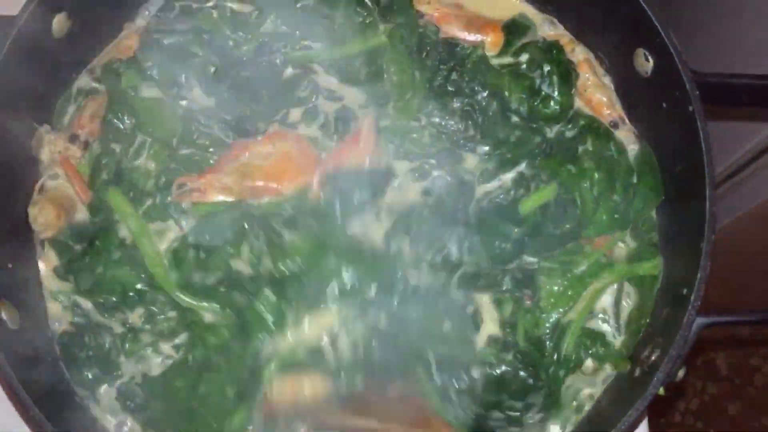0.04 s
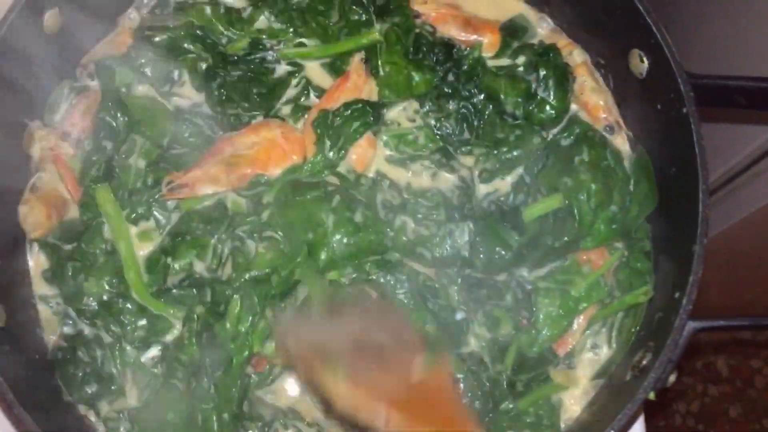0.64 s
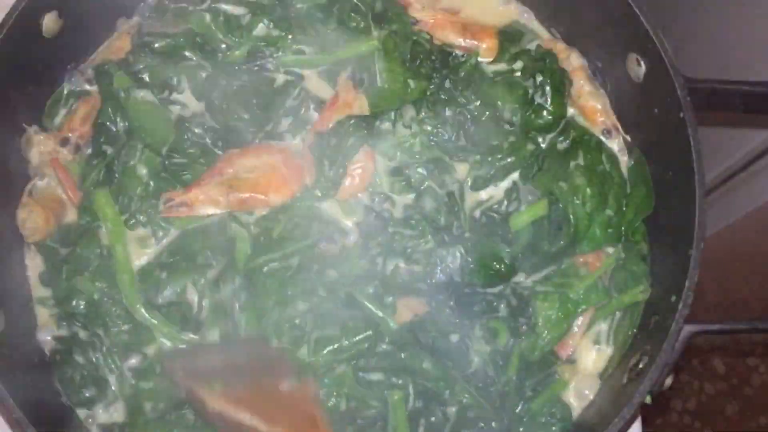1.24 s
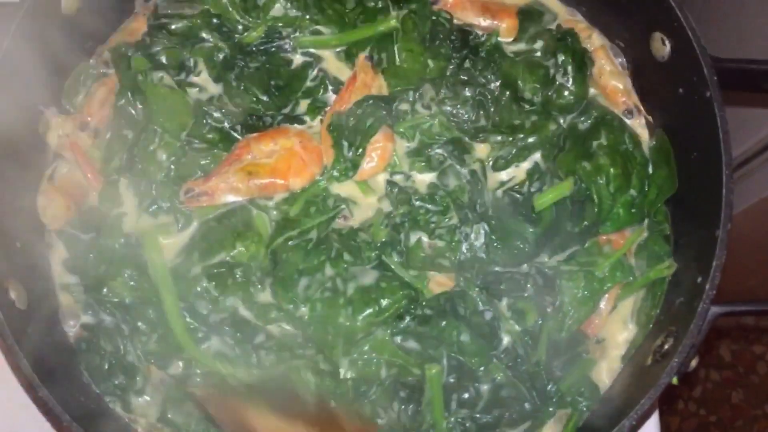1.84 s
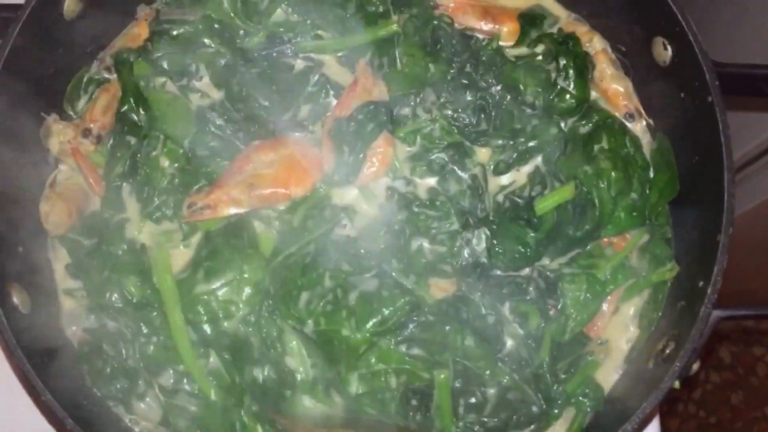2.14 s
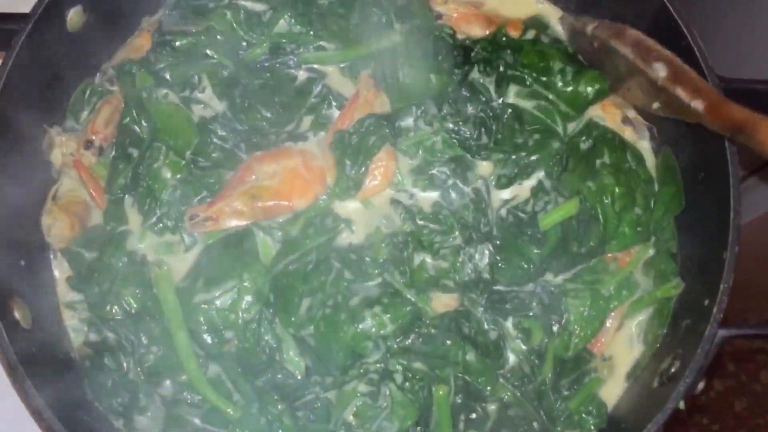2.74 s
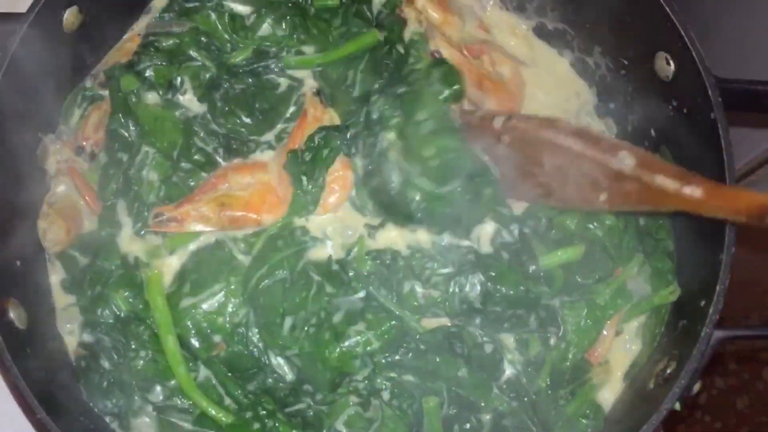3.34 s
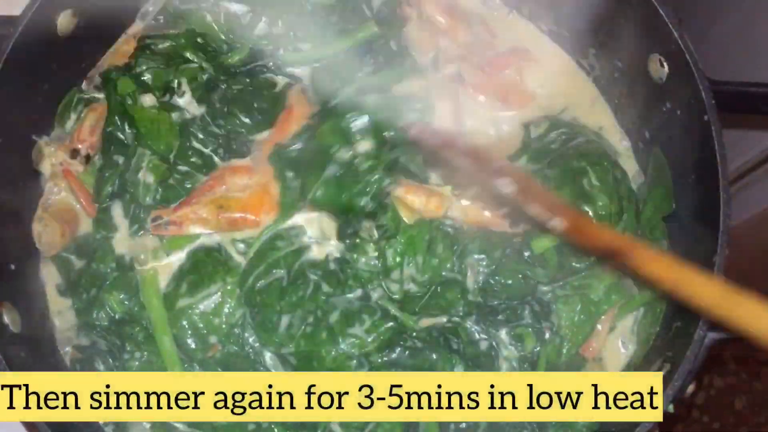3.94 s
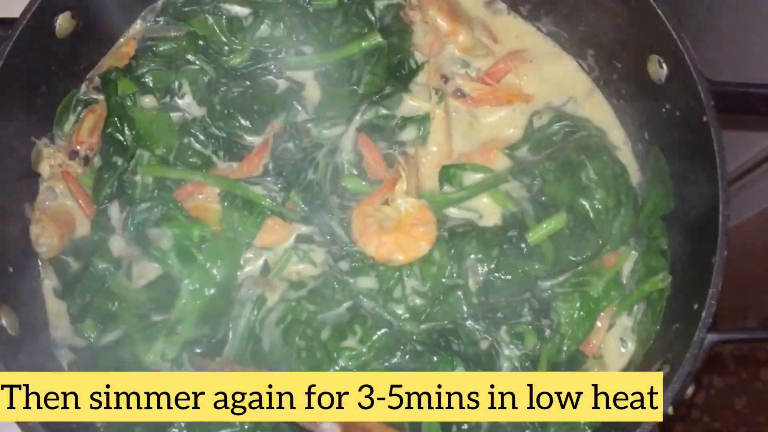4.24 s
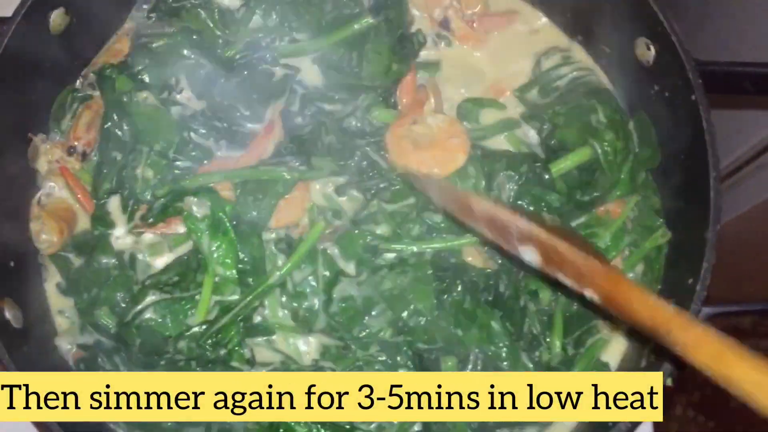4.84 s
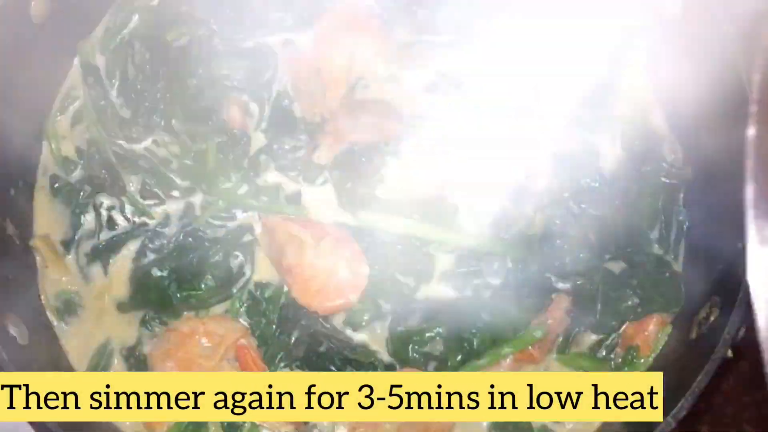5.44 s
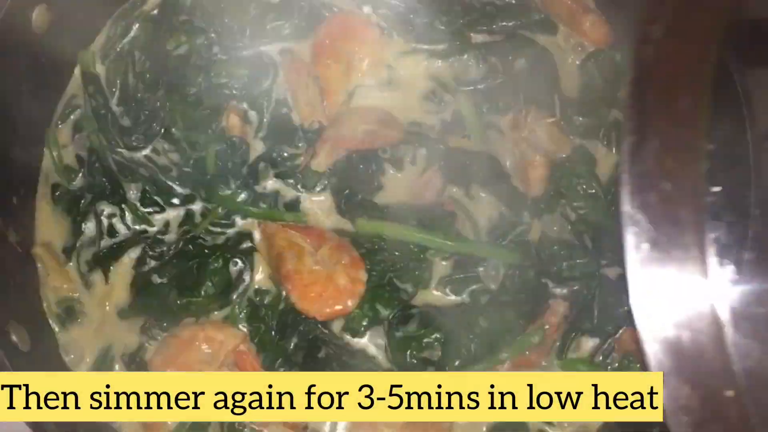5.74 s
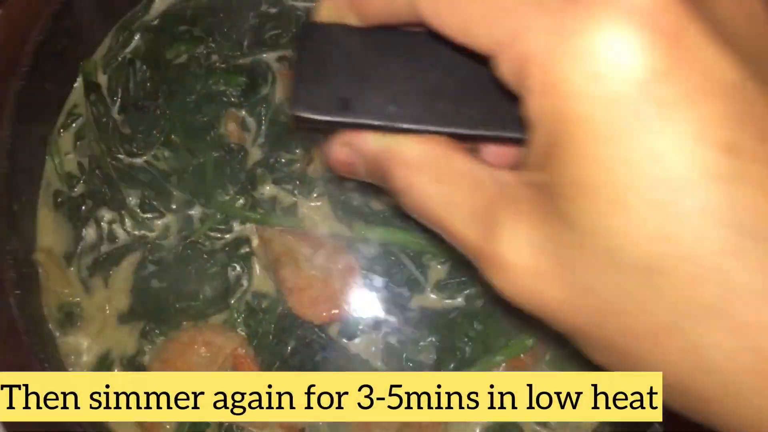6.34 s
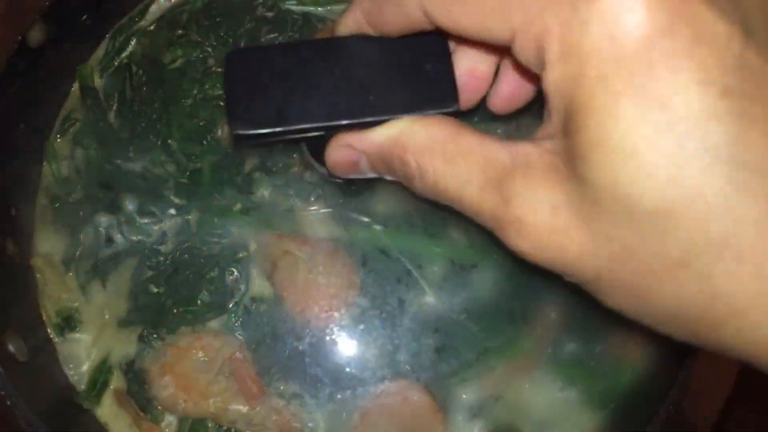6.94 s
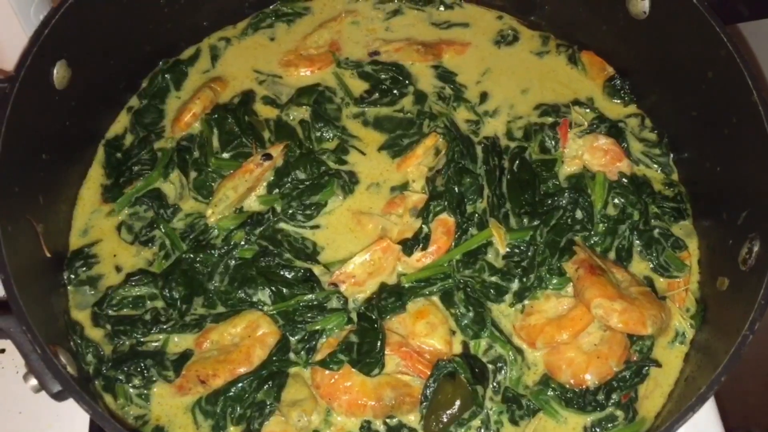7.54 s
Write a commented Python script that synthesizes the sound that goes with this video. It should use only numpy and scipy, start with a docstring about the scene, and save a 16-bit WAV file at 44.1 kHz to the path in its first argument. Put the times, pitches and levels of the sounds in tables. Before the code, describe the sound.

Thick sauce simmers in a pan from the start, close by in a kitchen: bubbles plop, fine ones crackle and spit, and a very faint high tone flutters. Until about 5.4 seconds a wooden spatula squelches through wet greens in uneven strokes, each swelling the bubbling. It knocks dully on the pan, loudest at the very start, around 0.4 seconds, at 4 and at 5.3, with a quick cluster near 4.6. From 5.6 seconds a glass lid ticks lightly as it approaches, and the sizzle grows muffled and hollow. At about 6.5 seconds the lid clanks loudly onto the rim and rocks into place with several quick contacts and a low thump. A deeper, hollow simmer with a couple of gulps continues underneath. Just after 7 seconds the cooking cuts off, and only a faint hiss remains until the end.

```python
"""Creamy sauce simmers with shrimp and greens, close by in a kitchen: thick bubbles plop, fine ones
crackle, and a faint high tone flutters. A wooden spatula squelches through the leaves and knocks the
pan. A glass lid muffles the sizzle, clanks onto the rim and leaves a hollow simmer.
After a short break only a faint hiss remains."""
import sys
import numpy as np
from scipy import signal
from scipy.fft import rfft, irfft, next_fast_len
from scipy.io import wavfile
from scipy.ndimage import uniform_filter1d, map_coordinates

SR = 44100
rng = np.random.default_rng(int(sys.argv[2]) if len(sys.argv) > 2 else 0)


def to_wav(sig):
    """Store sig (one row per channel, or 1-D mono) as 16-bit WAV at the path in sys.argv[1].

    Samples outside -1..1 are clipped; the rate is SR.
    """
    pcm = np.clip(np.atleast_2d(sig), -1, 1) * 32767
    pcm = np.round(pcm).astype(np.int16)
    wavfile.write(sys.argv[1], SR, pcm.T)  # frames by channels


N = 334264
TIME = np.arange(N) / SR
TOP_HZ = 16000


def amp(db):
    """Decibels to gain."""
    return 10 ** (np.asarray(db) / 20)


def unit(x):
    """Scale to rms 1."""
    return x / np.sqrt(np.mean(x ** 2) + 1e-20)


def along(points, hz):
    """Interpolate (freq_hz, value) points on a log axis."""
    freqs, values = np.transpose(points)
    return np.interp(np.log(hz + 1), np.log(freqs + 1), values)


def curve(points):
    """Interpolate (time_s, value) points at every sample."""
    return np.interp(TIME, *np.transpose(points))


def wobble(knots_per_s):
    """Smooth random curve."""
    return map_coordinates(rng.standard_normal(int(N * knots_per_s / SR) + 4), [TIME * knots_per_s])


def filtered(x, response):
    """Apply a gain given as a function of frequency."""
    size = next_fast_len(len(x) + 8192)
    return irfft(rfft(x, size) * response(np.fft.rfftfreq(size, 1 / SR)), size)[:len(x)]


def butter(x, order, hz, kind="low"):
    """Butterworth filter."""
    return signal.sosfilt(signal.butter(order, hz, kind, fs=SR, output="sos"), x)


def noise(spectrum, size=N):
    """Coloured noise, rms 1."""
    return unit(filtered(rng.standard_normal(size), lambda hz: amp(along(spectrum, hz))))


def fade(t, t60):
    """Exponential decay, 60 dB down at t60."""
    return np.exp(-np.log(1000) * t / t60)


def mode(t, hz, t60):
    """Decaying sine."""
    return np.sin(2 * np.pi * hz * t) * fade(t, t60)


def arch(t, length_s):
    """Rounded rise and fall."""
    return np.abs(np.sin(np.pi * np.clip(t / length_s, 0, 1))) ** .5


def add(track, start_s, sound):
    """Mix a sound into a track."""
    part = track[max(round(start_s * SR), 0):][:len(sound)]
    part += sound[:len(part)]


def bubble(t, hz, cycles, swell_share=0.09):
    """Bubble in thick sauce: a short tone swells as the film opens, then dies."""
    life_s = cycles / hz
    return 1.7 * mode(t, hz, life_s) * (1 - np.exp(-(t / life_s / swell_share) ** 2))


def swarm(clusters_per_s, hz, spread, cycles, range_db, samples):
    """Clusters of three bubbles of like pitch, small leading into large; few are loud; rms 1."""
    count = int(clusters_per_s * N / SR)
    when, pitch, strength = rng.random((3, count, 1))
    late, detune, life = rng.random((3, count, 3))
    family = spread * np.log((pitch + .015) / (1 - pitch + .015))  # bounded log-pitch offset
    pitches = np.minimum(hz * np.exp(family + 0.28 * (detune - .5)), TOP_HZ)
    gains = amp(range_db * np.minimum(-np.log(1 - strength), 2.6) - 9 * (1 - late))
    t = np.arange(samples) / SR
    grains = bubble(t, pitches[..., None], cycles * (.5 + life[..., None]), swell_share=.17)
    places = (when * N + late * .009 * SR).astype(int)[..., None] + np.arange(samples)
    return unit(np.bincount(places.ravel(), (gains[..., None] * grains).ravel(), N)[:N])


def pings(rows, cycles, gain_db, snap_db):
    """A noise snap and a short ring for each (start_s, level_db, pitch_hz)."""
    out, t = np.zeros(N), np.arange(SR // 20) / SR
    for start_s, db, hz in rows:
        snap = amp(snap_db) * fade(t, .005) * rng.standard_normal(len(t))
        add(out, start_s + 0.0022, amp(db + gain_db) * (bubble(t, hz, cycles) + snap))
    return out


# spatula strokes: start_s, length_s, effort_db, hiss_db
SPATULA_STROKES = [(0.0, 0.23, 3, 4), (0.303, 0.19, 3.5, 0), (0.566, 0.12, -3, 8), (0.926, 0.085, -4.5, 8),
                   (1.098, 0.19, -3.5, 5.5), (1.352, 0.13, -0.5, 5), (1.73, 0.23, -1.5, -13),
                   (2.106, 0.11, -4.5, 2), (2.27, 0.17, -5.5, 5.5), (2.705, 0.077, -1.5, 2),
                   (2.862, 0.23, -1, 8), (3.113, 0.22, -2, 1), (3.8, 0.11, -3, -3), (3.914, 0.18, -2.5, 9),
                   (4.225, 0.16, -1.5, 2.5), (4.536, 0.28, -3.5, -4), (4.825, 0.12, -3.5, -2),
                   (5.004, 0.075, 2, 0), (5.22, 0.14, -3.5, 2.5)]


def stirring(attack_s=0.0043, release_s=0.048):
    """Gain curves of the strokes: their effort, and the hiss of sauce on hot metal."""
    effort, hiss = np.zeros((2, N))
    for start_s, length_s, db, hiss_db in SPATULA_STROKES:
        t = TIME - start_s
        shape = np.clip(t / attack_s, 0, 1) * np.clip(1 - (t - length_s) / release_s, 0, 1)
        effort += amp(db) * shape
        hiss += amp(db + hiss_db) * shape
    return effort, hiss


# bursting film: freq_hz, density_db
SNAP_SPECTRUM = [(2000, -25), (4500, -2), (9000, 3), (16000, -1)]


def snaps(per_s=600, range_db=7):
    """Thin films of sauce burst in ticks that do not ring; few are loud; rms 1."""
    chance, strength, sign = rng.random((3, N))
    gains = amp(range_db * np.minimum(-np.log(1 - strength), 4))
    ticks = np.sign(sign - .5) * gains * (chance < per_s / SR)
    return unit(filtered(ticks, lambda hz: amp(along(SNAP_SPECTRUM, hz))))


# noise beds of the simmer: freq_hz, density_db
BROTH_SPECTRUM = [(100, -42), (350, -31.5), (700, 12), (1200, -12.5), (2500, -4.5), (4500, -11.5),
                  (12000, -65)]
SIZZLE_SPECTRUM = [(800, -40), (3000, 3.5), (5000, -6.5), (9300, -8.5), (10400, -12), (12000, 0),
                   (16000, -5)]
BODY_SPECTRUM = [(50, -31.5), (100, -0.5), (130, -11.5), (175, 3.5), (300, -7.5), (450, -9), (1000, -57),
                 (4000, -85.5)]
RUMBLE_SPECTRUM = [(20, -48.5), (33, -28), (46, 8.5), (70, -7), (110, -6), (200, -29.5), (1000, -91)]
# deep rumble: time_s, level_db
RUMBLE_LEVEL = [(0, -42.5), (.4, -72), (.52, -52), (.95, -66), (2.2, -65), (2.45, -58), (2.75, -65),
                (3.0, -47), (3.2, -61), (3.7, -56.5), (4.05, -60), (4.4, -77), (5.1, -63), (5.6, -63),
                (6.45, -68)]
# crackle gain, falling as the lid comes down: time_s, gain_db
CRACKLE_SHADE = [(5.4, -6.5), (5.85, -5.5), (6.0, -12.5), (6.45, -13.5)]


def simmer():
    """Bubbles burst in clumps over a soft wash, louder with each stroke, until the lid shuts them in."""
    effort, hiss = stirring()
    shade_db = curve(CRACKLE_SHADE)
    # gains: resting and stirred levels summed in power
    plop = np.hypot(amp(-52.5), amp(-46.5) * effort)
    wet = np.hypot(amp(-52), amp(-46) * effort) * amp(0.31 * shade_db)
    fizz = np.hypot(amp(-55), amp(-54.5) * hiss)
    blub = np.hypot(amp(-57.5), amp(-52.5) * effort) * amp(-0.38 * shade_db)
    clumps = wobble(60) + .6 * wobble(18)
    thick = swarm(170, hz=717, spread=0.16, cycles=5.8, range_db=4.5, samples=1100)
    squelch = swarm(260, hz=2168, spread=.27, cycles=15, range_db=5.5, samples=900)
    crackle = swarm(520, hz=7700, spread=0.19, cycles=20, range_db=13.5, samples=400)
    pinpricks = swarm(220, hz=11880, spread=0.073, cycles=27, range_db=10, samples=260)
    fine = swarm(1300, hz=5850, spread=.2, cycles=8.9, range_db=15, samples=100)
    films = snaps()
    sticky = swarm(700, hz=1680, spread=0.26, cycles=3.76, range_db=6.5, samples=220)
    wash = noise(BROTH_SPECTRUM)
    sizzle = amp(1.3 * wobble(110)) * noise(SIZZLE_SPECTRUM)
    blubs = swarm(130, hz=301.3, spread=0.17, cycles=4.5, range_db=6.5, samples=1500)
    mix = (plop * amp(-6 + 0.5 * clumps) * thick
           + wet * amp(-6 + clumps) * squelch
           + fizz * amp(shade_db - 2.5 + 0.88 * clumps) * crackle
           + fizz * amp(shade_db - 5.5 + 1.8 * clumps) * pinpricks
           + fizz * amp(0.44 * shade_db - 5 + 0.45 * clumps) * fine
           + fizz * amp(shade_db - 7 + 2 * clumps) * films
           + wet * amp(-8 + 0.67 * clumps) * sticky
           + plop * amp(-8 + 1.1 * clumps) * wash
           + fizz * amp(0.36 * shade_db - 12.5 + 0.86 * clumps) * sizzle
           + blub * amp(-2.5 + clumps) * blubs
           + blub * amp(-3 + 0.97 * clumps) * noise(BODY_SPECTRUM)
           + amp(curve(RUMBLE_LEVEL) + 2) * noise(RUMBLE_SPECTRUM))
    return mix * np.interp(TIME, [6.5, 6.7], [1, 0])


# high tone: time_s, level_db
WHISTLE_LEVEL = [(0, -76.5), (1.5, -75), (5.4, -73), (5.9, -70.5), (6.45, -70), (6.75, -75), (6.88, -70.5),
                 (7.05, -75)]


def whistle():
    """A faint high tone flutters and keeps breaking off."""
    hz = 7245 + 45 * wobble(300) + 14 * wobble(25)
    flicker_db = 2.5 * wobble(70) + 8 * np.minimum(wobble(28) + .2, 0)
    return amp(curve(WHISTLE_LEVEL) + flicker_db) * np.sin(2 * np.pi * np.cumsum(hz) / SR)


# spatula on the pan: start_s, level_db, thud_db, edge_db, t60_ratio
PAN_KNOCKS = [(0.027, -15.5, 12.5, -14, 0.56), (0.362, -18, 1.5, -8, 1), (0.469, -28, -31, -1, 1),
              (0.825, -28.5, -8.5, 0, 0.62), (1.132, -29.5, -4, 12, 1), (1.38, -28, 1, 6.5, 0.71),
              (1.395, -33.5, -7, -2, 1), (2.866, -39, -6, -2, 0.52), (2.985, -26, 9, 3, 1),
              (3.735, -30.5, -15, -3, 0.46), (3.747, -31.5, -6, 0, 0.87), (3.995, -23, -1.5, 0.5, 0.76),
              (4.06, -29.5, 7.5, 5, 0.91), (4.552, -30, -14, -6, 0.91), (4.589, -27.5, 5, 1, 0.51),
              (4.599, -30, -10, -6, 0.48), (4.623, -28, -5, 9.5, 0.56), (4.642, -28.5, -3, -1, 0.33),
              (4.954, -36.5, -8, 7, .6), (4.966, -33.5, -12, -3, 0.54), (5.2556, -17, -10.5, 10.5, 0.51),
              (5.32, -31, -22, -13, 0.44)]
# full pan, damped by the food: freq_hz, level_db, t60_s
PAN_MODES = [(191, -14, 0.098), (307, -9.5, 0.047), (615, 0.5, 0.029), (857, -2.5, 0.052),
             (1136, -2, 0.024), (1474, -4.5, 0.033), (2310, -12, 0.054), (2790, -11.5, 0.012),
             (3520, -18.5, 0.015)]
# wet splash: freq_hz, density_db
SPLASH_SPECTRUM = [(40, -40), (200, -9), (700, 5), (2600, 14), (3800, -17), (6000, -33), (16000, -33)]


def knocks(scatter_db=2):
    """Wood meets the pan through the food: a dead knock, pitched by where it lands, and a splash."""
    out, t = np.zeros(N), np.arange(SR // 5) / SR
    for start_s, db, thud_db, edge_db, t60_ratio in PAN_KNOCKS:
        touch = [(250, thud_db + 9), (800, 0), (2200, edge_db + 0.5)]
        detune = np.exp(0.045 * rng.standard_normal())
        ring = np.zeros(len(t))
        for k, (hz, mode_db, t60) in enumerate(PAN_MODES):
            gain = (-1) ** k * amp(mode_db + along(touch, hz) + rng.normal(0, scatter_db))
            ring += gain * mode(t, hz * detune, t60 * t60_ratio)
        splash = amp(-21 + edge_db / 2) * noise(SPLASH_SPECTRUM, len(t)) * fade(t, .05)
        add(out, start_s, amp(db + 2.5) * (ring / np.abs(ring).max() + splash))
    return out


# heavy strokes: start_s, level_db
PAN_BOOMS = [(0.027, -38.5), (0.336, -33), (0.43, -42.5), (0.54, -45.5), (2.983, -42)]
# booming pan: freq_hz, density_db
BOOM_SPECTRUM = [(25, -24), (50, -1), (90, -2), (130, 0), (190, 4), (300, -37), (500, -7), (1000, -46)]


def booms(attack_s=.008, t60_s=.6):
    """A heavy stroke shoves the pan, which booms briefly on the stove."""
    out, t = np.zeros(N), np.arange(SR // 2) / SR
    envelope = fade(t, t60_s) * (1 - np.exp(-t / attack_s))
    for start_s, db in PAN_BOOMS:
        add(out, start_s, amp(db) * noise(BOOM_SPECTRUM, len(t)) * envelope)
    return out


# spatula dragging through greens: start_s, length_s, level_db, centre_hz
LEAF_DRAGS = [(0.096, 0.11, -58, 2400), (0.317, 0.095, -47, 5600), (2.12, 0.042, -46.5, 7000),
              (2.906, 0.036, -40, 6300), (3.0, 0.11, -43.5, 1170), (3.149, 0.11, -51.5, 1210),
              (3.237, 0.019, -51.5, 4900), (4.865, 0.032, -47, 5500), (5.018, 0.039, -44.5, 3260)]


def drags(ticks_per_s=1700, octave_loss_db=6):
    """Wet leaves peel apart along the spatula: a dense swell of tiny tearing ticks."""
    out, t = np.zeros(N), np.arange(SR // 4) / SR
    for start_s, length_s, db, centre_hz in LEAF_DRAGS:
        ticks = rng.standard_normal(len(t)) * (rng.random(len(t)) < ticks_per_s / SR)
        tearing = filtered(ticks, lambda hz: amp(-octave_loss_db * np.log2((hz + 1) / centre_hz) ** 2))
        add(out, start_s, amp(db) * arch(t, length_s) * unit(tearing))
    return out


# spatula pushing wet leaves: start_s, level_db, pitch_hz, rasp_db
LEAF_PUSHES = [(0.117, -18, 1560, -47), (0.192, -19.5, 675, -52), (0.326, -10, 820, -41),
               (0.815, -16.5, 885, -44.5), (1.736, -12.5, 895, -46.5), (1.76, -16, 800, -49),
               (1.863, -47, 1600, -46), (2.133, -27.5, 730, -47.5), (2.278, -21.5, 657, -47),
               (2.919, -54, 750, -53), (3.24, -22, 710, -48), (4.012, -16.5, 623, -71),
               (4.257, -27, 4420, -40), (4.892, -17.5, 706, -43.5), (4.953, -20.5, 1340, -66),
               (5.035, -28, 900, -45)]
SLAP_HZ, FLURRY_CYCLES = 279, 5.5


def pushes():
    """Each push slaps the leaves and squeezes out a flurry of bubbles and a sticky rasp."""
    rasp_spectrum = [(1500, -2), (3500, 10), (5500, 7.5), (9000, 1), (16000, -30)]
    out, t = np.zeros(N), np.arange(SR // 10) / SR
    rasp_envelope = fade(t, 0.11) * (1 - np.exp(-t / 0.003))
    for start_s, db, hz, rasp_db in LEAF_PUSHES:
        for late, pitch, softness in rng.random((26, 3)):
            pop = bubble(t, hz * 2.8 ** (pitch - .3), FLURRY_CYCLES)
            add(out, start_s + 0.028 * late ** 1.5, amp(db - 10 - 22.6 * softness) * pop)
        stickiness_db = 4 * unit(uniform_filter1d(rng.standard_normal(len(t)), size=90))
        rasp = amp(stickiness_db) * noise(rasp_spectrum, len(t)) * rasp_envelope
        add(out, start_s, amp(rasp_db + 3.5) * rasp)
        slap = bubble(t, SLAP_HZ * np.exp(0.095 * rng.standard_normal()), cycles=6.7)
        add(out, start_s, amp(db - 14) * slap)
    return out


# sharp high ticks of sauce and spatula: start_s, level_db, pitch_hz
SHARP_TICKS = [(0.4863, -43.5, 9300), (0.807, -43.5, 9150), (0.8244, -37, 6600), (0.825, -37, 3810),
               (0.996, -44.5, 5200), (1.131, -44.5, 3880), (1.1327, -40, 8300), (1.699, -42, 9400),
               (1.817, -45, 5900), (1.8405, -42, 11400), (1.914, -42, 8350), (2.6828, -41, 8100),
               (3.48, -44.5, 5800), (3.6233, -40.5, 8950), (3.9642, -43.5, 6660), (4.0432, -42.5, 6500),
               (4.05, -34.5, 12500), (4.28, -40, 7600), (4.295, -42, 12900), (4.5895, -36, 3630),
               (4.5915, -40, 4920), (4.7376, -43.5, 8450), (5.236, -44.5, 12800), (5.355, -46, 13200),
               (3.547, -46, 9500), (4.391, -47.5, 8800), (4.599, -40.5, 7600), (4.783, -50, 8400),
               (5.123, -45, 9500), (5.265, -52, 9200), (5.317, -52, 9200)]


def sharp_ticks():
    """Sharp high ticks: sauce spitting, and the bright ring of spatula knocks on the pan."""
    return pings(SHARP_TICKS, cycles=17.6, gain_db=19, snap_db=-10)


# single large bubbles: start_s, level_db, pitch_hz
LARGE_BUBBLES = [(0.84, -36, 818), (0.997, -34.5, 930), (1.244, -31, 746), (1.271, -34, 860),
                 (1.593, -29, 2100), (1.609, -29, 2440), (1.734, -22.5, 830), (1.747, -24, 850),
                 (1.867, -22.5, 1570), (1.945, -29.5, 2290), (2.01, -32.5, 670), (2.159, -31.5, 680),
                 (2.589, -34.5, 730), (2.718, -33.5, 670), (2.847, -31.5, 690), (3.135, -29, 2380),
                 (3.322, -40, 855), (3.628, -31, 825), (3.796, -34, 830), (3.956, -29, 675),
                 (4.128, -32, 690), (4.299, -29.5, 3000), (4.39, -30.5, 1260), (4.432, -33, 680),
                 (5.296, -30, 1380), (5.681, -31.5, 695), (5.964, -34, 690), (5.974, -45, 510),
                 (6.098, -29.5, 666), (6.126, -41, 870), (6.195, -32.5, 710), (6.212, -30, 633),
                 (6.235, -47, 620), (6.287, -40, 685), (6.352, -32, 626), (6.428, -33, 540)]


def plops(trail_s=0.029):
    """A large bubble rings, collapses with a dull slap and leaves smaller ones of scattered pitch."""
    out, t = pings(LARGE_BUBBLES, cycles=13, gain_db=1.5, snap_db=-30), np.arange(SR // 20) / SR
    for start_s, db, hz in LARGE_BUBBLES:
        for late, pitch, softness in rng.random((7, 3)):
            pop = bubble(t, hz * 3.2 ** (pitch - .3), FLURRY_CYCLES)
            add(out, start_s + trail_s * late, amp(db - 7 - 3.4 * softness) * pop)
        slap = bubble(t, SLAP_HZ * np.exp(0.25 * rng.standard_normal()), cycles=3)
        add(out, start_s, amp(db - 7) * slap)
    return out


# pockets squeezed shut by the spatula: start_s, length_s, level_db, first_hz, last_hz
SAUCE_POCKETS = [(1.378, 0.023, -43, 3400, 3800), (1.755, 0.026, -40.5, 2650, 2860),
                 (1.857, 0.027, -41, 1450, 1650), (2.786, .016, -44, 1400, 1910),
                 (2.859, 0.026, -42, 2170, 2600), (2.928, .018, -44, 2300, 1800),
                 (3.061, 0.013, -37, 705, 780), (3.157, 0.069, -43, 1050, 840),
                 (3.235, .018, -41, 905, 1330), (3.829, .008, -45, 3350, 3400),
                 (3.883, 0.011, -43.5, 1480, 1580), (4.118, 0.019, -46.5, 3650, 3500),
                 (4.225, 0.022, -44.5, 1650, 1950), (4.319, 0.025, -41.5, 1690, 1460),
                 (4.365, 0.011, -44, 3100, 3200), (4.428, 0.017, -41.5, 1680, 1520),
                 (4.566, .016, -42, 2250, 2400), (4.659, 0.02, -41.5, 3150, 2950),
                 (4.728, 0.065, -47.5, 2300, 2120), (4.822, 0.029, -50, 2300, 2450),
                 (4.912, .012, -37.5, 706, 637), (5.024, 0.017, -40, 2230, 1600),
                 (5.067, 0.029, -39, 804, 690)]


def squelches(bubbles_per_s=450, pitch_scatter=.08):
    """A closing pocket of sauce lets out a chain of bubbles whose pitch slides with its size."""
    out, t = np.zeros(N), np.arange(SR // 25) / SR
    for start_s, length_s, db, first_hz, last_hz in SAUCE_POCKETS:
        count = 1 + int(length_s * bubbles_per_s)
        chain = np.zeros(SR // 5)
        for k, (late, detune, softness) in enumerate(rng.random((30, 3))[:count]):
            progress = (k + late) / count
            hz = first_hz * (last_hz / first_hz) ** progress * np.exp(pitch_scatter * (2 * detune - 1))
            add(chain, length_s * progress, amp(-8 * softness) * bubble(t, hz, cycles=np.sqrt(hz / 13)))
        rms = np.sqrt(np.sum(chain ** 2) / (length_s * SR))
        add(out, start_s, amp(db - 5.5) * chain / rms)
    return out


def rub(start_s=1.42, length_s=0.34, pitch_hz=900):
    """Wood slides along the pan and draws a faint, rough hum from it."""
    hum = unit(filtered(rng.standard_normal(N), lambda hz: 1 / (1 + ((hz - pitch_hz) / 75) ** 2)))
    return amp(-52) * arch(TIME - start_s, length_s) * hum


# light ticks of the lid: start_s, level_db, pitch_hz
LID_TINKS = [(5.599, -33.5, 1900), (5.638, -39, 2660), (5.712, -35.5, 3380), (5.752, -35.5, 2640),
             (5.776, -35.5, 2700), (6.354, -37.5, 2270), (6.42, -53, 1640)]


def tinks():
    """The lid ticks and rings lightly as it is carried in."""
    return pings(LID_TINKS, cycles=55, gain_db=-1, snap_db=-5)


# simmer under the lid: freq_hz, density_db
COVERED_SPECTRUM = [(18, -54.5), (30, -21.5), (134, -6), (280, -11.5), (394, -6.5), (486, -12), (540, -35),
                    (1070, -27.5), (2060, -33), (2540, -33.5), (2750, -31.5), (2980, -36.5), (6050, -40),
                    (7470, -43.5), (16000, -51.5)]
# big bubbles under the lid: start_s, level_db, pitch_hz
COVERED_GULPS = [(6.64, -14, 423), (6.859, -26.5, 392)]


def covered_simmer():
    """The bubbling turns hollow as the lid nears; under the lid it deepens and big bubbles gulp."""
    nearing = amp(-52.5) * swarm(120, hz=678, spread=.12, cycles=26, range_db=2, samples=1600)
    gurgle = amp(-51) * swarm(70, hz=400, spread=.06, cycles=14, range_db=2.5, samples=2400)
    hollow = amp(-44) * noise(COVERED_SPECTRUM) + gurgle
    for start_s, db, hz in COVERED_GULPS:
        add(hollow, start_s, amp(db) * bubble(np.arange(SR // 8) / SR, hz, cycles=27))
    nearing *= np.interp(TIME, [5.7, 6.4, 6.55], [0, 1, 0])
    return nearing + hollow * np.interp(TIME, [6.3, 6.7], [0, 1])


# lid meeting the rim: start_s, level_db, cutoff_hz, body_db, rattle_db
LID_CONTACTS = [(6.489, -7, 4240, 3, -28), (6.503, -5, 10000, -7.5, -17), (6.5506, -8.5, 2200, 0, -34.5),
                (6.6045, -11.5, 1650, 4.5, -35.5), (6.640, -14.5, 595, 1.5, -4), (6.658, -25, 600, 6, -9)]
# lid on the pan: freq_hz, level_db, t60_s
LID_MODES = [(162, -20, .1), (198, -22, 0.1), (216, -13, 0.08), (305.5, -14.5, .09), (463, -9.5, 0.084),
             (508, -1, 0.048), (600, -14.5, .06), (737, -17, 0.14), (832, -16.5, 0.072),
             (955, -22.5, 0.097), (1147, -12.5, 0.11), (1272, -3.5, 0.055), (1430, -12.5, 0.05),
             (1660, -14, 0.076), (1930, -14.5, 0.045), (2390, -14.5, 0.065), (2560, -16, 0.058),
             (2730, -27, 0.044), (3390, -7, .022), (4200, -21.5, .03), (5100, -27.5, .03),
             (6650, -19, .025), (7800, -25.5, .03)]
# contact clack and rattle of the steel rim: freq_hz, density_db
CLACK_SPECTRUM = [(25, -52.5), (60, -20), (170, 5), (500, -1), (900, -5), (1300, -4.5), (3000, -13),
                  (5000, -19), (9000, -27.5), (16000, -33)]
RATTLE_SPECTRUM = [(700, -29), (1300, -5.5), (1950, -11), (2400, 4.5), (3300, -2.5), (4300, -12.5),
                   (6300, -15.5), (10000, -24), (16000, -26)]


def clanks(scatter_db=2):
    """The lid lands on one side and rocks into place; softer contacts are duller."""
    out, t = np.zeros(N), np.arange(SR // 3) / SR
    for start_s, db, cutoff_hz, body_db, rattle_db in LID_CONTACTS:
        ring = np.zeros(len(t))
        for k, (hz, mode_db, t60) in enumerate(LID_MODES):
            detune = np.exp(.01 * rng.standard_normal())  # each contact clamps the rim differently
            lag_s = 0.00065 * np.sqrt(500 / hz)  # low bending waves travel slower
            gain = (-1) ** k * amp(mode_db + rng.normal(0, scatter_db))
            add(ring, lag_s, gain * mode(t, hz * detune, t60))
        clack = amp(-0.5) * noise(CLACK_SPECTRUM, len(t)) * fade(t, 0.03)
        blow = butter(amp(-5) * ring + clack, 3, cutoff_hz)
        blow = butter(blow, 2, 110, "high")
        low_shelf = (amp(body_db) - 1) * butter(blow, 1, 600)
        rattle = amp(rattle_db) * noise(RATTLE_SPECTRUM, len(t)) * fade(t, .035)
        add(out, start_s, amp(db) * (blow + low_shelf + rattle))
    return out


# pan rocking on the stove: freq_hz, level_db, t60_s
STOVE_MODES = [(58, -29.5, 0.32), (85, -31, .15), (135.3, -16.5, .16)]


def thumps(attack_s=0.016):
    """The lid's weight jolts the whole pan on the stove at every contact."""
    out, t = np.zeros(N), np.arange(SR // 2) / SR
    rise = 1 - np.exp(-t / attack_s)
    for start_s, db, _, body_db, _ in LID_CONTACTS:
        for hz, mode_db, t60 in STOVE_MODES:
            detune = np.exp(.06 * rng.standard_normal())
            add(out, start_s, amp(db + body_db + mode_db) * mode(t, hz * detune, t60) * rise)
    return out


# quiet kitchen: freq_hz, density_db
HISS_SPECTRUM = [(15, -36), (25, -15), (52, -6), (70, -21), (97, -12.5), (285, -18.5), (476, -24.5),
                 (840, -25.5), (1100, -27), (3920, -33), (14800, -42.5), (16000, -47)]


def faint_hiss(start_s=7.08, rise_s=0.035):
    """A faint, slightly wavering hiss fades in."""
    return amp(-61.5 + wobble(15)) * noise(HISS_SPECTRUM) * np.clip((TIME - start_s) / rise_s, 0, 1)


def early_echoes(x, span_s=.018, wet_db=-12):
    """The pan's wall and nearby tiles return weak copies; they are too small to reflect the bass."""
    late, sign = rng.random((2, 24))
    taps = np.zeros(SR // 20)
    taps[((.001 + span_s * late) * SR).astype(int)] = np.sign(sign - .5) * amp(-12 * late)
    taps = butter(taps / np.linalg.norm(taps), 2, 500, "high")
    return x + amp(wet_db) * signal.fftconvolve(x, taps)[:N]


# room decay: freq_hz, t60_s
KITCHEN_DECAY = [(100, 1), (200, 0.45), (300, 0.21), (700, 0.56), (2500, 0.44), (3500, .3), (6000, 0.26),
                 (15000, 0.26)]


def kitchen(x, wet_db):
    """Hard walls reverberate; the bass lingers longest."""
    hz, t, bins = signal.stft(rng.standard_normal(SR), SR, nperseg=256)
    colour_db = along([(200, 1), (1500, -4.5), (3500, -4.5), (7000, -3.5), (15000, -0.5)], hz)
    decay = fade(t, along(KITCHEN_DECAY, hz)[:, None])
    tail = signal.istft(bins * amp(colour_db)[:, None] * decay, SR, nperseg=256)[1]
    tail = np.pad(tail / np.linalg.norm(tail), (SR // 200, 0))
    return x + amp(wet_db) * signal.fftconvolve(x, tail)[:N]


def scene(break_s=7.047):
    """Cooking with one short dip in level, a brief silence, then faint hiss."""
    pops = plops() + sharp_ticks()
    food = amp(-0.5) * early_echoes(simmer() + pushes() + drags() + rub() + pops) + squelches()
    cooking = kitchen(food + tinks(), wet_db=-16.5)
    cooking += kitchen(knocks(), wet_db=-12.5) + kitchen(clanks(), wet_db=-10)
    cooking += thumps() + booms() + covered_simmer() + whistle()
    dip_db = np.interp(TIME, [5.44, 5.445, 5.465], [0, -18, 0])
    return cooking * amp(dip_db) * (TIME < break_s) + faint_hiss()


def record(dry):
    """Small microphone: no deep bass, a softer top octave, rounded peaks, a band limit."""
    treble_db = [(7000, 0), (9300, 1), (10300, -3), (12000, -2), (16000, -2)]
    x = butter(dry, 6, 37, "high")
    x = filtered(x, lambda hz: amp(along(treble_db, hz)))
    x = x / (1 + (x / .85) ** 6) ** (1 / 6)
    return filtered(x, lambda hz: 1 / np.sqrt(1 + (hz / TOP_HZ) ** 160))


dry = scene()
out = record(dry)
to_wav(out)
```